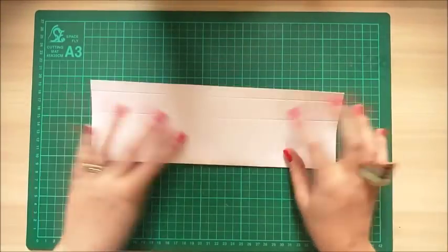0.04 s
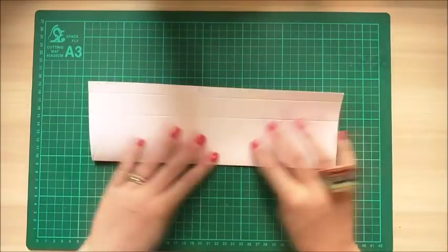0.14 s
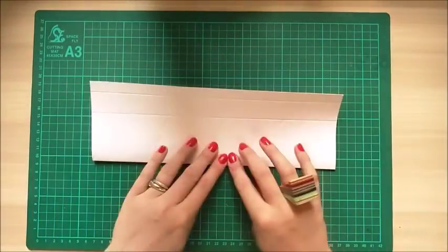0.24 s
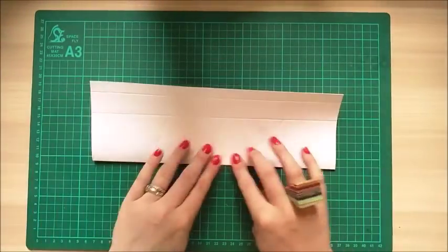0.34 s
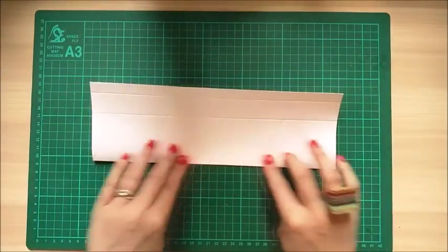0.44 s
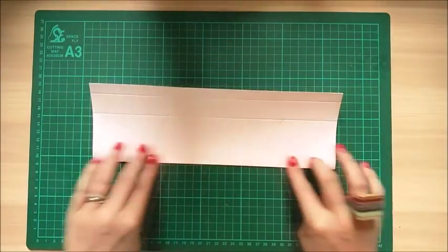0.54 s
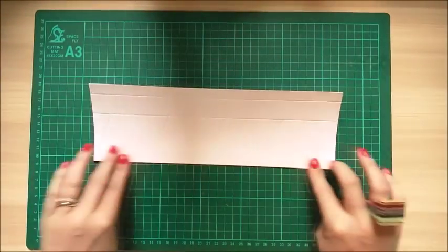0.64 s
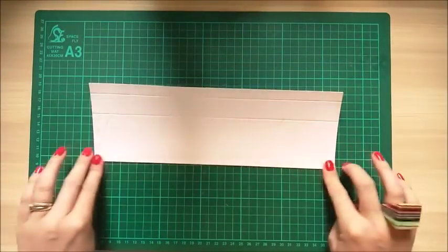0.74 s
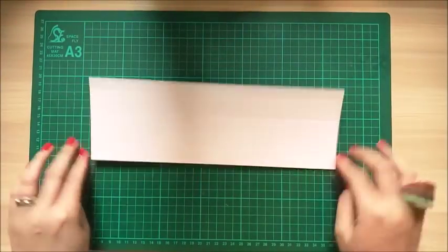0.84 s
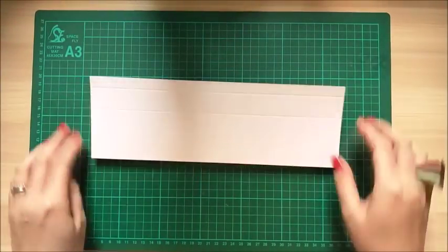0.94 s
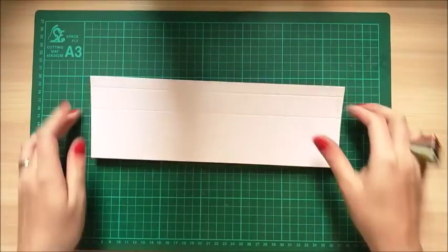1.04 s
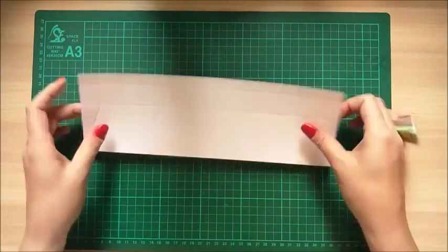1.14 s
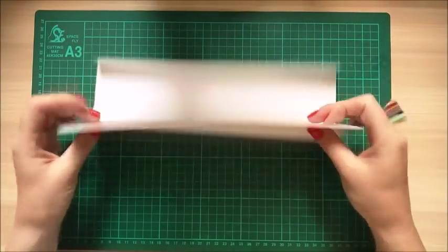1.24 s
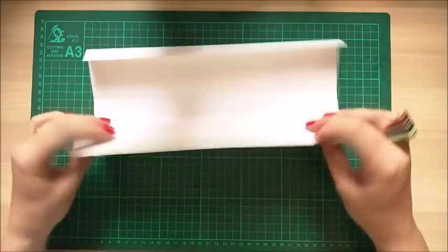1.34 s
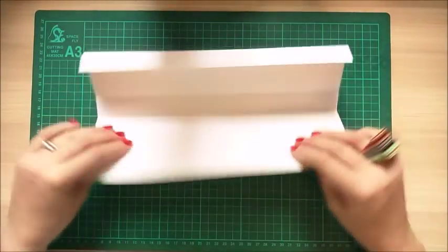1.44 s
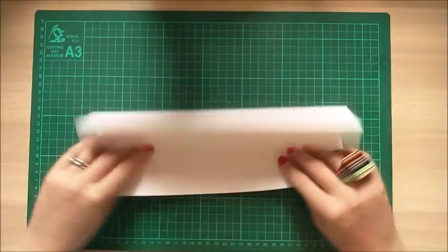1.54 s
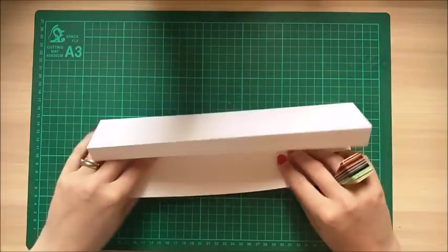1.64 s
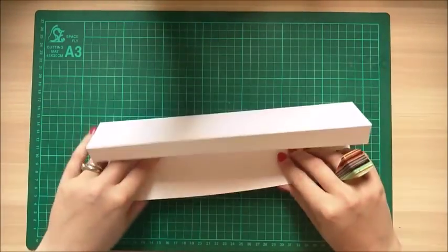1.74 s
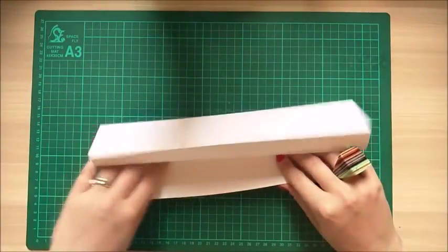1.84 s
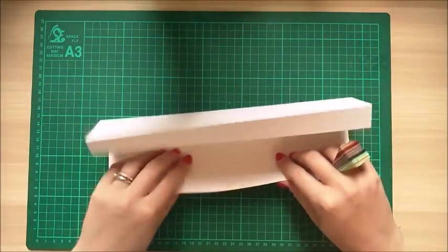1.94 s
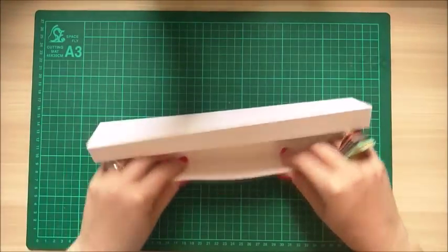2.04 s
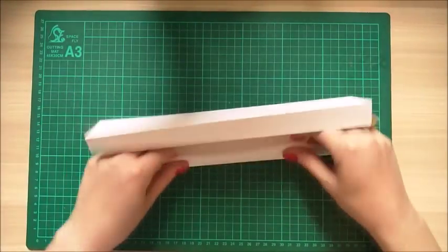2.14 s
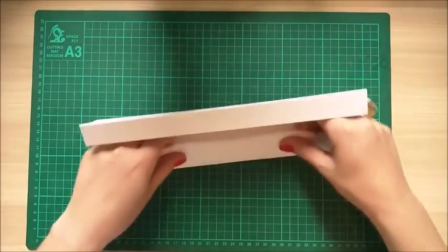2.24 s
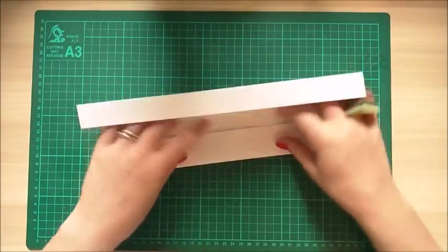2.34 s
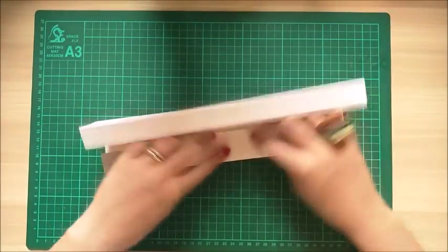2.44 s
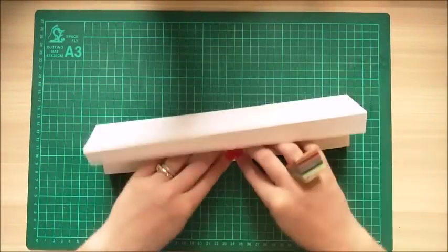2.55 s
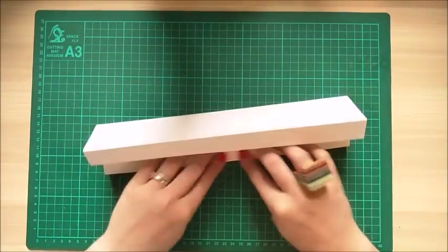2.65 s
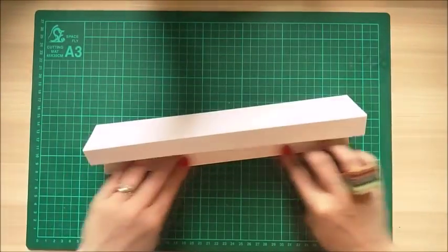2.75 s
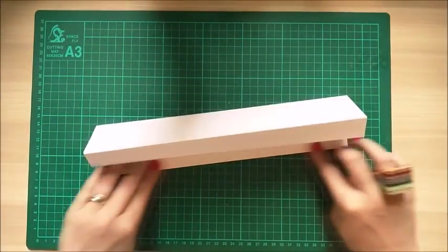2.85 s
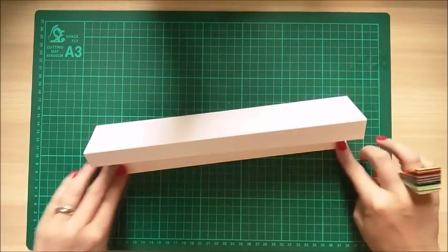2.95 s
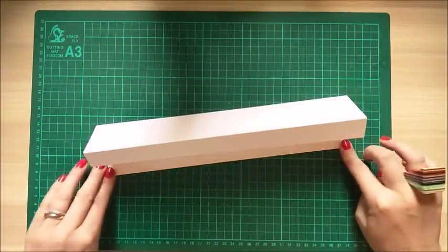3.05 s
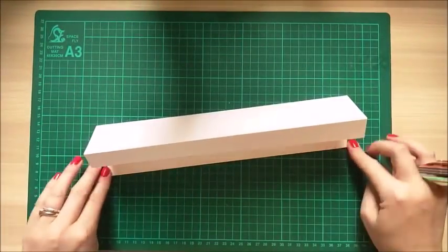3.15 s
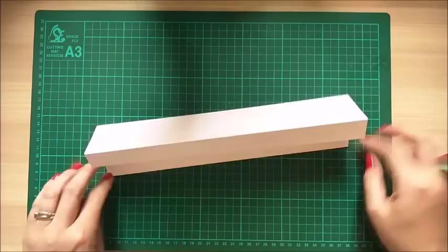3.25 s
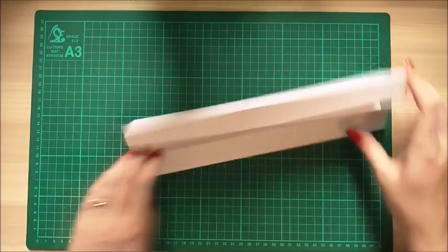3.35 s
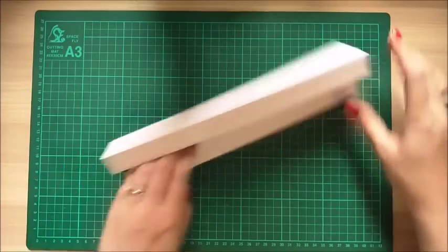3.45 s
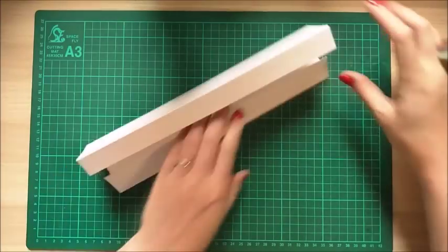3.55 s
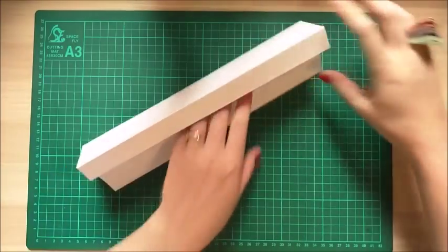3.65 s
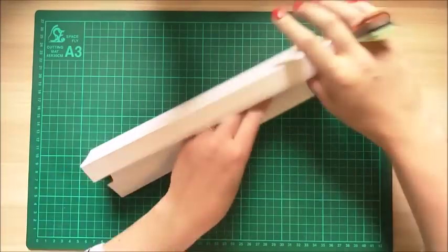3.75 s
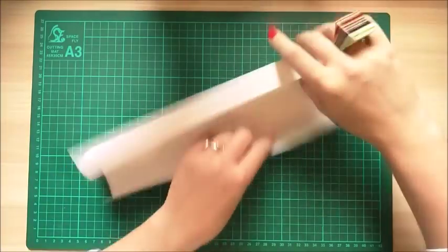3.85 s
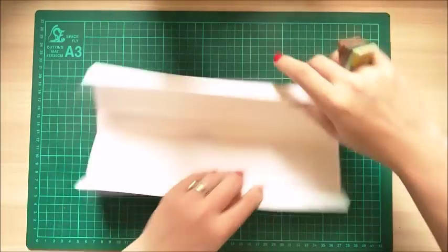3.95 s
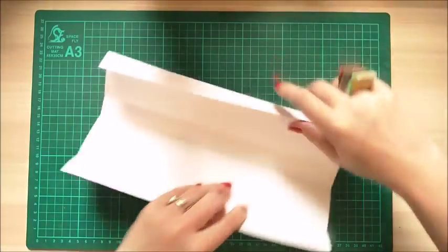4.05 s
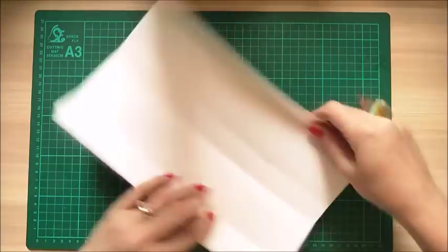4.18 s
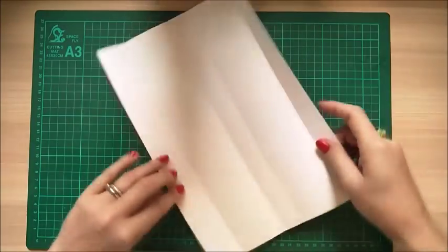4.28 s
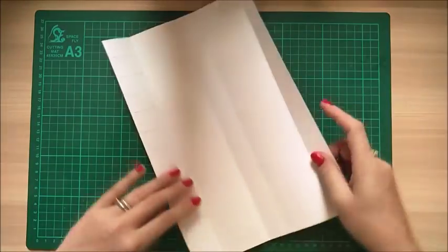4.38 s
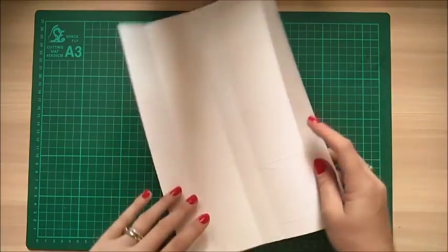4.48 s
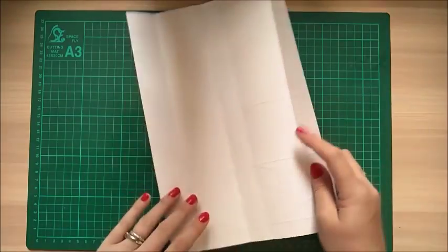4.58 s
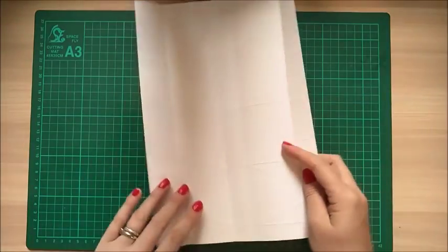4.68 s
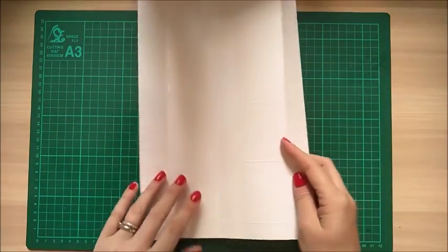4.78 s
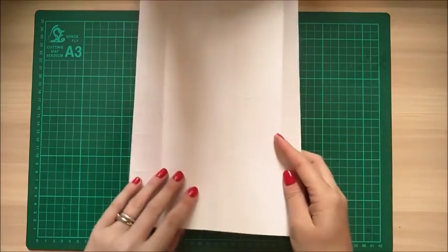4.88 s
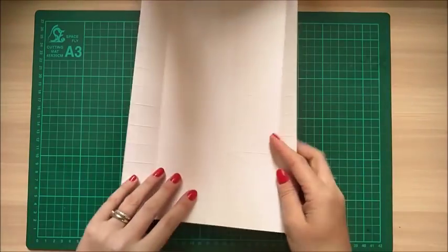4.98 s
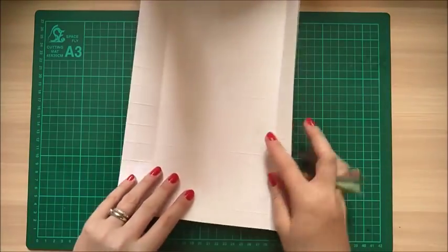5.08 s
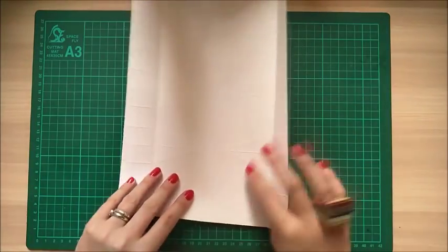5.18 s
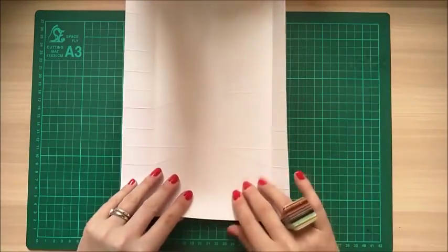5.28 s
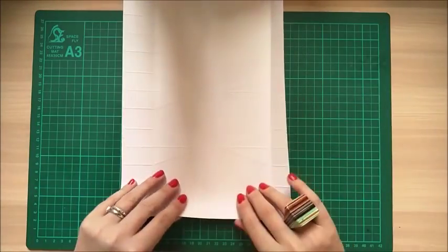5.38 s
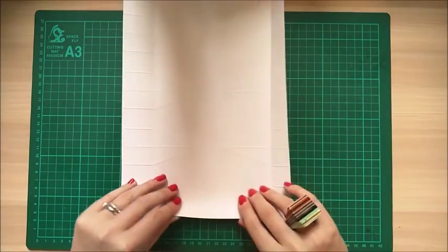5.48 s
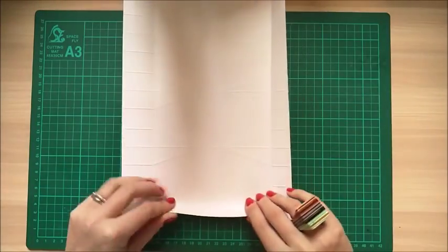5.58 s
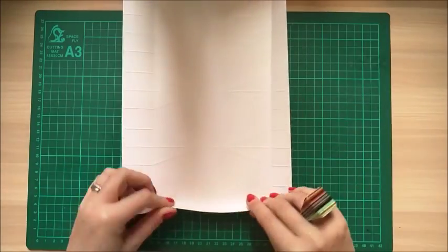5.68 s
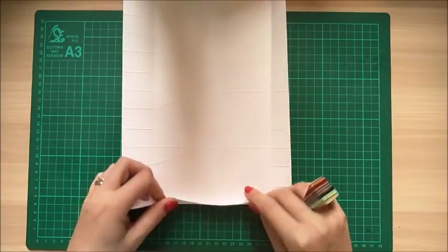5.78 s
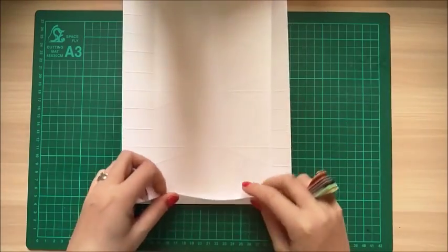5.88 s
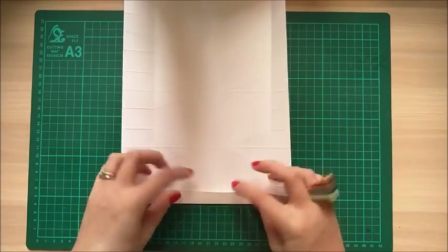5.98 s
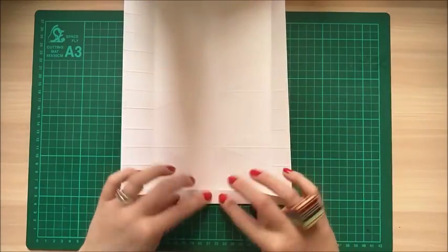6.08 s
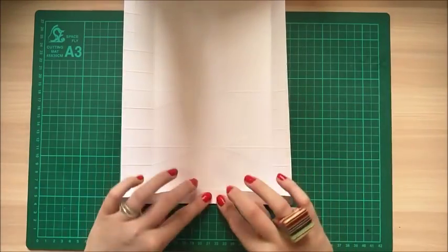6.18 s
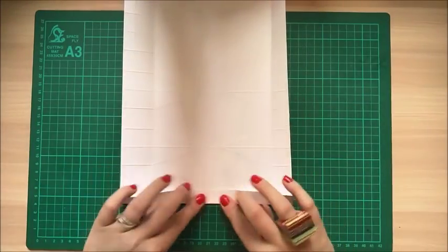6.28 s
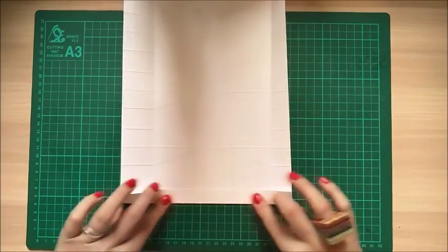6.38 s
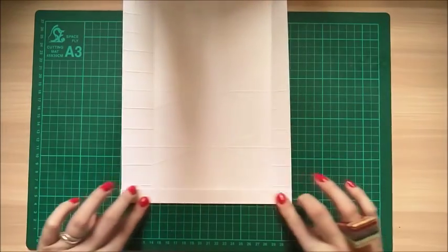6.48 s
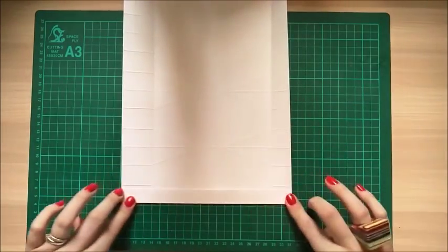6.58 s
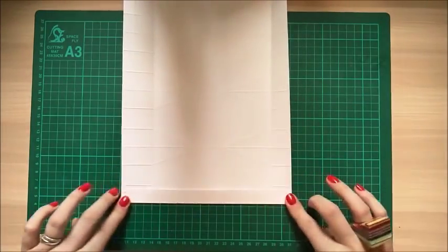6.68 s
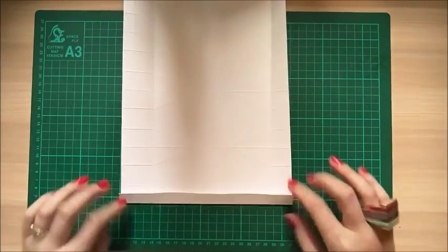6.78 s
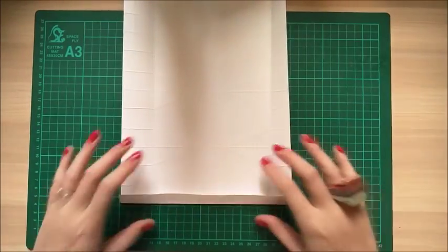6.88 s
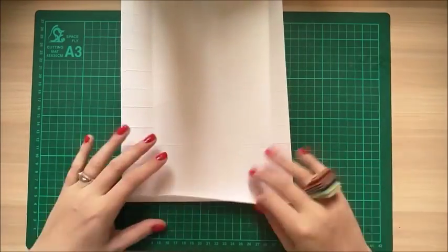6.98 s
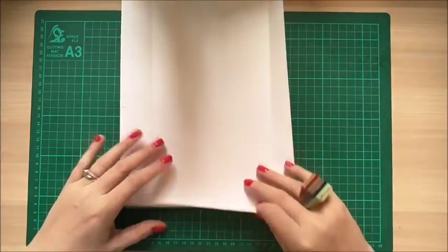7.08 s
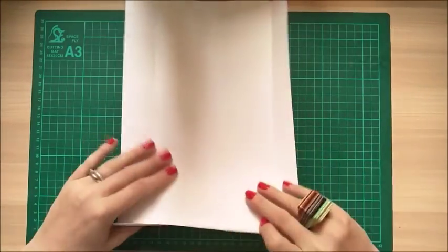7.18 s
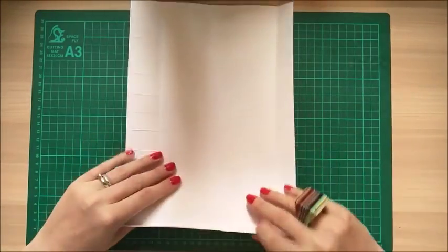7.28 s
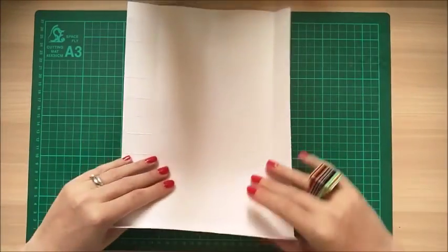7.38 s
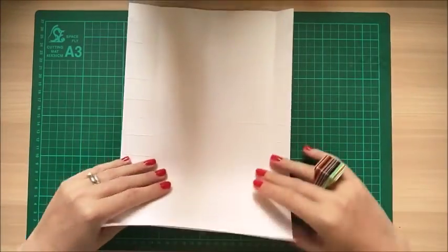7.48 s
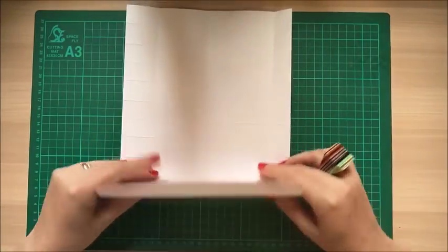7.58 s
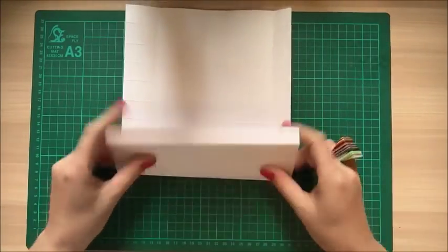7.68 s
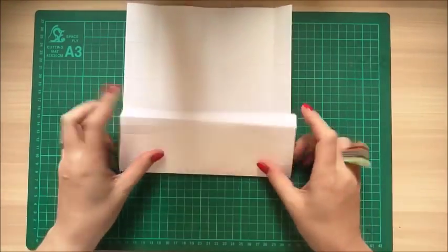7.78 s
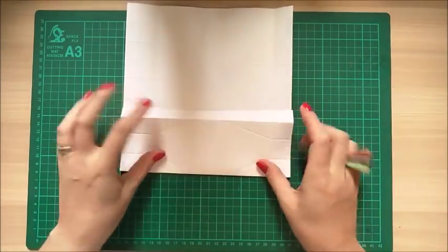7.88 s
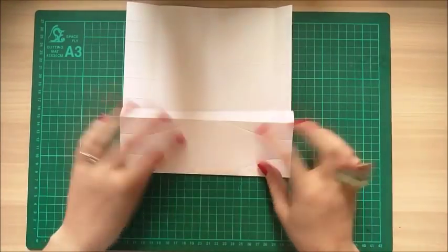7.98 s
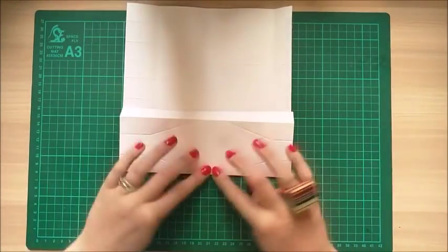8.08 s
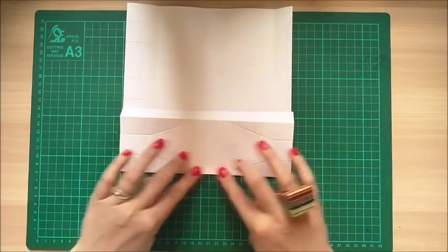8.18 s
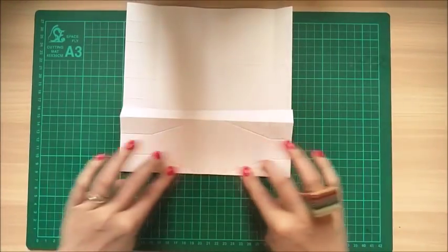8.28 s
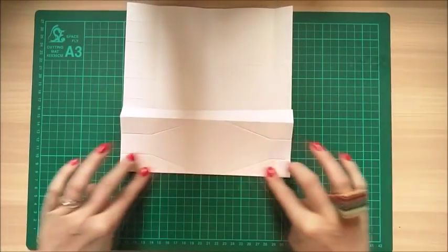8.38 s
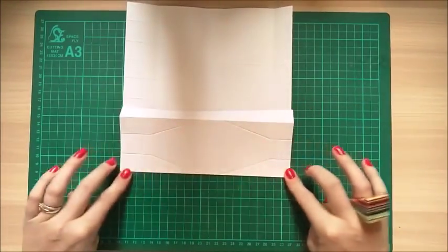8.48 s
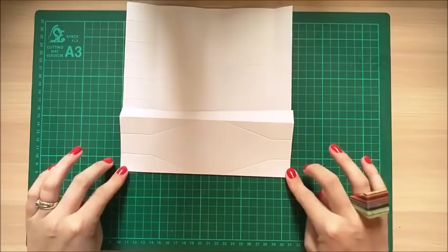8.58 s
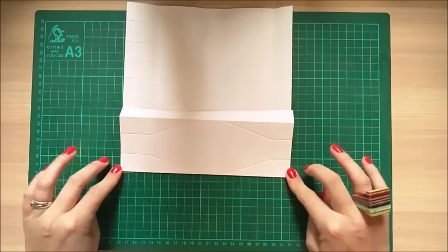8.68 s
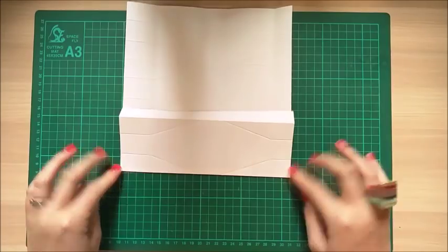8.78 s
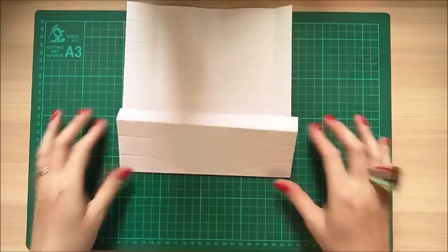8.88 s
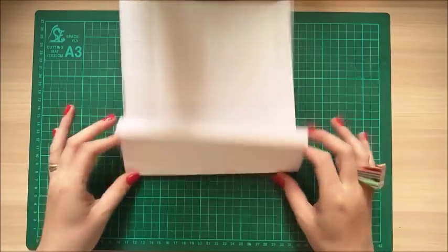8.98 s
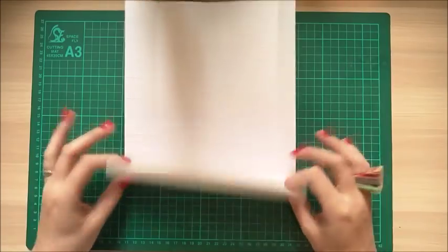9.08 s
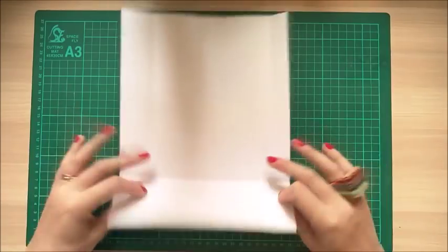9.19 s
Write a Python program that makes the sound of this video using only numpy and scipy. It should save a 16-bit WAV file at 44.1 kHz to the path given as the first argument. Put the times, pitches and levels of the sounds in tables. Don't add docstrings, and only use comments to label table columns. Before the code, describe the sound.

In a small quiet room, close to a stereo recorder, hands work stiff card on a mat. Scrape and fibre crackles come first, then a smooth fingertip press along a crease. A sharp snap and boxy knocks follow as the long folds close. The sheet is opened and turned with papery pops, then its end is creased with softer rubs, ticks and crackles, over faint hiss.

```python
import sys
import numpy as np
from scipy import signal
from scipy.fft import rfft, irfft, next_fast_len
from scipy.io import wavfile
from scipy.ndimage import uniform_filter1d, minimum_filter1d

SR = 44100
rng = np.random.default_rng(int(sys.argv[2]) if len(sys.argv) > 2 else 0)


def wav_record(signal):
    frames = np.transpose(np.atleast_2d(signal))
    bounded = np.clip(frames, -1, 1)
    quanta = np.round(bounded * 32767).astype(np.int16)
    wavfile.write(sys.argv[1], SR, quanta)


def natural_amplitude(level_db):
    exponent = np.asarray(level_db, float) / 20
    return 10 ** exponent


N = 407043
SIZE = next_fast_len(N, True)
HZ = np.fft.rfftfreq(SIZE, 1 / SR)


def evened(x):
    return x / np.sqrt(np.mean(x ** 2) + 1e-20)


def read(points, hz):
    f, value = np.transpose(points)
    return np.interp(np.log(hz + 1), np.log(f + 1), value)


def colour(x, gain):
    return irfft(rfft(x, SIZE) * gain, SIZE)[..., :N]


def modes(table, hz):
    power = sum(natural_amplitude(db) ** 2 / (1 + (2 * (hz - f) / width) ** 2) ** 2 for f, width, db in table)
    return np.sqrt(power)


def causal(gain):
    log = np.log(np.maximum(np.r_[gain, gain[-2:0:-1]], 1e-5))
    return np.fft.ifft(np.exp(signal.hilbert(log).conj())).real[:len(gain)]


# frequency in Hz, level in dB per Hz.
FLOOR_SPECTRUM = [(18, -70), (30, -38), (75, -12), (245, 0), (1350, -11.5), (1760, -8), (3580, -12.5),
                  (7270, -17), (12300, -4), (16000, -19)]


def floor():
    hiss = colour(rng.standard_normal((2, N)), natural_amplitude(read(FLOOR_SPECTRUM, HZ)))
    return natural_amplitude(-65.5) * evened(hiss)


# frequency in Hz, decay time (t60) in seconds.
ROOM_DECAY = [(200, 0.25), (1000, 0.29), (4000, 0.29), (15000, 0.033)]


def room(x):
    taps = np.zeros((2, SR // 2))
    jitter = rng.integers(0, 20, (2, (SR // 2 - 201) // 20))
    at = np.arange(200, SR // 2 - 20, 20) + jitter
    np.put_along_axis(taps, at, rng.choice([-1., 1.], at.shape), 1)
    hz, t, z = signal.stft(taps, SR, nperseg=256)
    t60 = np.maximum(read(ROOM_DECAY, hz), .05)[:, None]
    tail = signal.istft(z * natural_amplitude(-60 * t / t60), SR, nperseg=256)[1]
    return signal.fftconvolve(x, tail / np.linalg.norm(tail[0]), axes=1)[:, :N]


# frequency in Hz, left over right in dB.
PORT_TILT = [(60, 0.5), (110, 2), (200, 1.5), (380, -0.5), (700, 2), (1290, 2.5), (2380, 1), (4400, 4.5),
             (8120, 16), (15000, 34)]
# frequency in Hz, likeness from 0 to 1.
PORT_LIKENESS = [(60, 0.3), (130, 0.9), (250, 0.76), (500, 0.94), (1000, 0.6), (2000, 0.29), (5000, 0.02),
                 (15000, 0)]


def to_ports(a, b):
    lead_s = .0001
    same = np.clip(read(PORT_LIKENESS, HZ), 0, 1)
    right = natural_amplitude(-read(PORT_TILT, HZ))
    both = 2 / np.sqrt(1 + right ** 2 + 2 * same * right)
    late = colour(a, both * right * same * np.exp(-2j * np.pi * HZ * lead_s))
    own = colour(b, both * right * np.sqrt(1 - same ** 2))
    return np.array([colour(a, both), late + own])


# start in seconds, peak level in dB, pitch in Hz.
LANDINGS = [(0.017, -40, 260), (0.155, -33.5, 294), (0.245, -29, 244), (0.292, -41, 354),
            (1.11, -41.5, 242), (1.288, -45.5, 258), (3.491, -38, 308), (4.393, -42, 280),
            (5.005, -50, 257), (5.166, -51, 260), (7.182, -55, 276), (7.251, -58, 276), (7.851, -44, 242),
            (7.907, -41, 300), (9.061, -44.5, 216), (9.086, -44, 250), (9.137, -33, 320), (9.152, -39, 256)]


def thuds():
    rise_s = .003
    t, out = np.arange(2000) / SR, np.zeros((2, N + 2000))
    swell = t / rise_s * np.exp(1 - t / rise_s)
    for s, db, hz in LANDINGS:
        out[0, round(s * SR):][:len(t)] += natural_amplitude(db) * swell * np.sin(2 * np.pi * hz * t)
    return out[:, :N]


# start in seconds, peak level in dB, ring pitch in Hz, treble
# against the ring in dB. The folded hollow knocks.
HOLLOW_KNOCKS = [(0.152, -19, 780, -16.5), (1.675, -20, 720, -4), (1.909, -36, 666, -5),
                 (1.989, -37, 446, -5), (2.124, -17.5, 695, -13), (2.399, -31.5, 417, -10),
                 (2.55, -26, 430, -11), (3.234, -28.5, 416, -37), (3.378, -43, 585, -21),
                 (3.589, -20.5, 636, -8.5), (3.643, -23.5, 456, -46), (3.8, -49, 369, -14),
                 (3.926, -28.5, 690, -23.5), (4.011, -27, 618, -9.5), (4.324, -38, 884, -18),
                 (4.859, -37.5, 443, -7), (5.003, -40.5, 860, -5), (5.058, -40.5, 440, -23),
                 (5.163, -45, 440, -5), (6.389, -43.5, 535, -5), (6.834, -46, 423, -5),
                 (7.459, -38.5, 484, -0.5), (8.741, -53, 440, 0)]
SHEET_POPS = [(0.243, -21.5, 1150, -24), (0.26, -16, 1900, -11.5), (0.955, -43, 1610, -5),
              (0.998, -33, 2070, -14.5), (1.08, -32, 1190, -18), (1.4993, -17, 1280, -24),
              (4.04, -21, 1640, -8), (4.127, -32.5, 1180, -3), (4.231, -28, 1120, -27),
              (4.35, -24.5, 1190, -12), (4.39, -25.5, 1330, -16), (4.758, -35.5, 1190, -12.5),
              (4.816, -30.5, 1090, -15), (7.179, -37, 1300, -9), (7.231, -34, 1650, -16),
              (7.361, -24, 1500, -13), (7.777, -31, 1770, -7), (7.93, -23, 1560, -5),
              (7.981, -21.5, 1830, -45), (8.094, -34.5, 1800, -2), (8.156, -29, 1500, -24),
              (8.375, -33.5, 1900, -5), (8.645, -43, 1910, -10), (8.886, -47, 1910, -19),
              (9.061, -41, 1900, -12)]
EDGE_TICKS = [(0.079, -25, 2090, -5), (1.175, -49, 2100, -5), (1.818, -32.5, 2730, -5.5),
              (3.226, -49, 2830, -2), (5.201, -31, 3170, -5), (5.33, -33, 2370, -17),
              (5.384, -35, 2980, -11), (5.425, -31.5, 2700, -22), (6.118, -37, 2700, -9),
              (6.185, -40.5, 2300, -5), (7.052, -31, 2980, -5)]
FIBRE_CRACKLES = [(0.016, -28, 1340, -31), (0.106, -23.5, 1400, -20), (0.16, -19, 1420, -16),
                  (0.236, -25, 1500, -9), (0.268, -21.5, 1460, -23), (0.302, -26.5, 1510, -11),
                  (0.313, -27, 1700, -15), (0.357, -29, 1610, -10.5), (0.979, -36, 1310, -7),
                  (0.995, -43, 600, -25), (1.196, -35, 1030, -12), (1.222, -31, 1190, -19),
                  (1.284, -38, 1200, -18), (1.499, -12.5, 645, -11), (1.512, -27.5, 422, -32),
                  (3.597, -15.5, 640, -25), (3.606, -23, 620, -35), (3.65, -25, 490, -30),
                  (4.296, -35, 1030, -19), (4.518, -33.5, 1670, -12), (5.203, -47, 704, -28),
                  (8.242, -39, 1860, -6), (8.344, -36.5, 1960, -3), (1.506, -34, 3460, -5),
                  (1.581, -28.5, 990, -16), (1.69, -21.5, 715, -15), (1.703, -29, 715, -28),
                  (2.138, -34, 617, -34), (2.16, -33, 614, -27), (2.178, -32, 3900, -5),
                  (2.272, -36, 3220, -14.5), (3.338, -39.5, 594, -10), (3.444, -32.5, 617, -28),
                  (3.481, -34.5, 700, -25), (3.514, -39, 700, -25), (3.625, -22, 565, -31),
                  (3.884, -42, 394, -20), (7.202, -42, 1310, -15), (7.217, -38, 1410, -15),
                  (7.249, -34, 1100, -13), (7.814, -38, 1740, -13), (7.906, -31, 930, -19),
                  (9.05, -42, 3360, -5), (9.186, -38, 610, -13),
                  (2.295, -28.5, 616, -33), (2.454, -32.5, 1210, -22), (2.465, -36, 457, -25),
                (4.047, -21.5, 1790, -11), (4.054, -23.5, 1050, -11), (4.063, -32, 1750, -6),
                (4.398, -21.5, 1000, -12), (4.766, -46, 1000, -15), (4.857, -33.5, 483, -31),
                (5.3, -35, 2560, -13), (7.7, -42, 750, -29), (7.73, -42, 770, -27), (9.135, -24, 1860, -12),
                (9.14, -20.5, 1810, -12), (9.143, -27, 1000, -12), (9.151, -28, 806, -18),
                (9.162, -31.5, 1110, -17)]
CLEAN_CLICKS = [(0.138, -30, 1920, -20), (0.2605, -19, 3800, -20), (0.265, -33, 3400, -20),
                (0.31, -33, 4070, -18), (1.4984, -22, 5600, -28), (1.4996, -15, 3730, -13),
                (1.6761, -16, 6600, -9), (1.678, -29, 4340, -31), (2.556, -25, 2600, -20),
                (3.599, -36, 2100, -18), (3.807, -32, 3990, -12), (3.86, -35, 1700, -22),
                (4, -35, 3000, -20), (4.047, -27, 3400, -16), (4.233, -47, 3800, -20),
                (4.395, -24, 4100, -17), (5.4267, -36, 2700, -16), (7.064, -31, 2620, -20),
                (1.5, -18, 960, -36), (0.152, -24, 1450, -23), (3.043, -45, 9000, -18),
                (6.119, -40, 4000, -16), (6.833, -47, 3000, -12), (3.379, -42, 900, -20),
                (8.899, -40, 1860, -14)]
# frequency in Hz, level in dB per Hz.
CRACK_SPECTRUM = [(300, -28), (600, -5.5), (1600, -11), (3600, -4), (6200, -4), (8500, -4), (12200, 2),
                  (16000, -3)]
# frequency in Hz, width in Hz, level in dB.
HOLLOW_MODES = [(270, 85, 7), (392.5, 90, 2.5), (479, 46, 0.5), (610, 70, 0), (750, 96, 2.5)]


def snaps():
    kinds = [(HOLLOW_KNOCKS, .086), (SHEET_POPS, .054), (EDGE_TICKS, .05),
             (FIBRE_CRACKLES, .041), (CLEAN_CLICKS, .011)]
    t, out = np.arange(3600) / SR, np.zeros((2, N + 8000))
    for events, t60 in kinds:
        for s, db, ring_hz, treble_db in events:
            sound = snap(t, t60, ring_hz, min(treble_db, -5))
            at = round(s * SR)
            out[:, at:at + sound.shape[1]] += natural_amplitude(db - 7.5) * sound
    return out[:, :N]


def snap(t, t60, ring_hz, treble_db):
    hz = np.fft.rfftfreq(2048, 1 / SR)
    noise = rng.standard_normal((2, len(t)))
    crack = noise * (1 - np.exp(-t / 0.00095)) * natural_amplitude(-60 * t / .006)
    jolts_db = 4.5 * evened(uniform_filter1d(noise[0, ::-1], size=int(.0015 * SR)))
    rattle = noise[::-1] * (1 - np.exp(-t / 0.0017)) * natural_amplitude(-60 * t / t60 + jolts_db)
    octave_up = np.clip(np.log2(hz / 2500 + 1e-9), 0, 1)
    bright = natural_amplitude(read(CRACK_SPECTRUM, hz) + (treble_db + 2.5) * octave_up)
    wide = 0.33 + 0.5 * (t60 < .03)
    ring = modes([(ring_hz, wide * ring_hz, 0), (1.674 * ring_hz, 0.37 * ring_hz, -8)], hz)
    ring = ring + 0.014 * modes(HOLLOW_MODES, hz)
    strike = rattle + 2.6 * crack + 7 * signal.unit_impulse(len(t), 30)
    body = signal.fftconvolve(strike, causal(ring)[None], axes=1)
    edge = signal.fftconvolve(crack + .11 * rattle, causal(bright)[None], axes=1)
    return body / abs(body).max() + natural_amplitude(1.08 * (treble_db + 17.5)) * edge / abs(edge).max()


def slips(per_s, spread_db, clump_s, clump_db):
    length = int(clump_s * SR)
    clumps = evened(uniform_filter1d(uniform_filter1d(rng.standard_normal(N), length), length))
    sizes = natural_amplitude(spread_db * np.minimum(rng.exponential(1, N), 3.5))
    clicks = sizes * (rng.random(N) < per_s / SR)
    return natural_amplitude(clump_db * np.minimum(clumps, 1)) * (1 + clicks) * rng.standard_normal((2, N))


def gripped(drive, table, centre_hz, fall_db):
    lines, out = rfft(drive, SIZE), 0
    for mode in table:
        ring = irfft(lines * modes([mode], HZ), SIZE)[:, :N]
        out = out + natural_amplitude(-fall_db * np.log2(mode[0] / centre_hz) ** 2) * ring
    return out / np.sqrt(uniform_filter1d((out ** 2).mean(0), SR // 2))


def grip_hz(snapped, rest_hz, pull, t):
    s, _, hz, _ = np.transpose(snapped)
    return rest_hz * (np.interp(t, s, hz) / rest_hz) ** pull


def strokes(rows, t, blunt):
    s, rise, fall, db = np.transpose(rows)[:4, :, None]
    far = np.where(t < s, (s - t) / np.maximum(rise, .005), (t - s) / np.maximum(fall, .005))
    return natural_amplitude(2 * (db - 20 * np.minimum(far, 20) ** blunt))


# frequency in Hz, level in dB per Hz.
RUB_SPECTRUM = [(530, -73), (900, -15), (979, -29), (1340, -30), (2020, -17.5), (3510, -30.5), (4100, -20),
                (7060, -8.5), (12100, 5.5), (15100, 0.5), (16000, -36)]


def fingertip_rub(strength, pressed):
    clump_db = 1.68 * (1.5 - 1.3 * pressed)
    hiss = slips(per_s=300, spread_db=2.0, clump_s=0.025, clump_db=clump_db)
    return strength * evened(colour(hiss, natural_amplitude(read(RUB_SPECTRUM, HZ))))


# frequency in Hz, width in Hz, level in dB.
SCRAPE_MODES = [(2700, 2760, 3.5), (4070, 990, -7.5), (6460, 4300, 1.5)]
# time in seconds, scrape level in dB.
DRAG_LEVEL = [(0, -1.5), (.9, 0.5), (1.4, -1), (1.7, 3), (2.15, -3), (2.6, 2.5), (3.3, -2), (3.47, -2),
              (3.8, 0), (4.2, -4), (4.8, 0.5), (5.6, 1), (6.2, -1), (6.7, 1.5), (7.08, 0), (7.5, 3),
              (8.2, -1.5), (9.1, -2.5)]


def edge_scrape(strength, hz, t):
    drag = natural_amplitude(np.interp(t, *np.transpose(DRAG_LEVEL)))
    grit = slips(per_s=400, spread_db=4.0, clump_s=0.025, clump_db=2.5)
    return drag * strength * gripped(grit, SCRAPE_MODES, hz, fall_db=18)


# frequency in Hz, width in Hz, level in dB.
SHEET_MODES = [(1190, 1730, 3), (1560, 620, -3), (1860, 230, 5.5), (1960, 2700, 3)]


def bending_sheet(strength, hz, t):
    flap = (t > 7.74) & (t < 9)
    grains = slips(per_s=110, spread_db=6.5, clump_s=0.022, clump_db=5.0)
    pocket = evened(colour(grains, modes([(1850, 200, 0)], HZ)))
    grains = slips(per_s=420, spread_db=5.5, clump_s=0.011, clump_db=4.5)
    sheet = gripped(grains, SHEET_MODES, hz, fall_db=36)
    return strength * (natural_amplitude(-7) * flap * pocket + natural_amplitude(-2 - 2 * flap) * sheet)


def folded_hollow(strength, hz):
    creaks = slips(per_s=60, spread_db=1.5, clump_s=0.01, clump_db=3.0)
    return natural_amplitude(-2.0) * strength * gripped(creaks, HOLLOW_MODES, hz, fall_db=14)


# peak time in seconds, rise in seconds, fall in seconds, effort in dB.
CREASE_PRESSES = [
    (0.654, 0.28, 0.23, -41),
    (2.923, 0.24, 0.23, -40),
    (6.476, 0.17, 0.29, -42.5),
    (8.406, 0.12, 0.21, -43),
]
# peak time
# in seconds, rise in seconds, fall in seconds, effort in dB.
SLIDES = [(0.013, 0.14, 0.054, -32), (0.079, 0.059, 0.12, -40), (0.266, 0.26, 0.16, -36.5),
          (0.981, 0.05, 0.068, -39), (1.118, 0.046, 0.047, -56), (1.195, 0.034, 0.03, -41),
          (1.24, 0.11, 0.14, -45), (1.367, 0.092, 0.11, -33.5), (1.5, 0.025, 0.19, -38.5),
          (1.674, 0.21, 0.43, -41.5), (1.826, 0.13, 0.022, -46), (1.997, 0.25, 0.15, -40),
          (2.135, 0.039, 0.071, -61), (2.178, 0.11, 0.041, -31.5), (2.225, 0.045, 0.066, -42.5),
          (2.275, 0.013, 0.026, -35.5), (2.31, 0.09, 0.21, -43), (2.472, 0.13, 0.013, -35),
          (2.599, 0.23, 0.079, -39), (3.222, 0.045, 0.27, -55.5), (3.343, 0.11, 0.017, -53.5),
          (3.41, 0.026, 0.11, -36.5), (3.455, 0.055, 0.088, -33), (3.5, 0.064, 0.094, -39.5),
          (3.588, 0.043, 0.94, -41.5), (3.825, 0.029, 0.088, -31.5), (3.913, 0.066, 0.083, -37.5),
          (4.051, 0.12, 0.3, -37.5),
          (4.233, 0.009, 0.024, -37.5), (4.314, 0.026, 0.17, -38.5), (4.532, 0.39, 0.077, -42.5),
               (4.663, 0.23, 0.082, -45), (4.934, 0.51, 0.47, -50.5), (5.106, 0.062, 0.057, -44.5),
               (5.203, 0.069, 0.054, -42.5), (5.27, 0.05, 0.11, -45.5), (5.609, 0.65, 0.27, -44),
               (5.757, 0.11, 0.07, -46.5), (5.878, 0.19, 0.08, -50), (5.933, 0.037, 0.086, -45.5),
               (6.06, 0.11, 0.12, -52), (6.113, 0.025, 0.025, -45), (6.183, 0.024, 0.14, -40),
               (6.87, 0.051, 0.061, -49.5), (7.088, 0.043, 0.096, -34.5), (7.273, 0.16, 0.06, -45.5),
               (7.373, 0.24, 0.06, -43.5), (7.526, 0.2, 0.56, -45.5), (7.79, 0.028, 0.75, -36),
               (7.922, 0.42, 0.17, -36), (8.168, 0.081, 0.063, -37), (8.252, 0.049, 0.21, -52),
               (8.751, 0.024, 0.079, -55), (8.893, 0.032, 0.03, -41.5), (9.072, 0.033, 0.024, -30.5),
               (9.123, 0.066, 0.15, -39.5)]
# peak time in seconds, rise in seconds, fall in seconds, effort in
# dB, hollow against sheet in dB.
BENDS = [(0.168, 0.45, 0.2, -41.5, -1), (0.03, 0.047, 0.099, -36.5, -9),
         (0.255, 0.045, 0.073, -30.5, -7), (0.309, 0.035, 0.15, -41, -6.5),
         (0.598, 0.27, 0.039, -55.5, -7), (0.672, 0.093, 0.64, -55, -11),
         (0.98, 0.027, 0.066, -41, -8), (1.083, 0.023, 0.11, -47, 1), (1.212, 0.065, 0.27, -46, -5),
         (1.49, 0.0048, 0.28, -38, -1), (1.668, 0.013, 0.13, -32, 11), (1.919, 0.043, 0.054, -57, 0),
         (1.994, 0.051, 0.046, -42.5, 15), (2.125, 0.014, 0.16, -37.5, 8),
         (2.3, 0.016, 0.061, -38.5, 22), (2.472, 0.68, 0.19, -47, 5), (2.538, 0.01, 0.84, -54, 7),
         (3.23, 0.0086, 0.046, -44, 18), (3.384, 0.012, 0.042, -46, 12),
         (3.46, 0.057, 0.034, -44.5, 19), (3.505, 0.052, 0.076, -41.5, 12),
         (3.588, 0.021, 0.14, -29, 17), (3.68, 0.05, 0.11, -55, 10), (3.82, 0.035, 0.11, -48, 11),
         (3.938, 0.11, 0.15, -39, 9), (4.05, 0.022, 0.17, -38, -8),
         (4.23, 0.022, 0.31, -51.5, -32.5), (4.397, 0.065, 0.095, -37.5, -3),
         (4.519, 0.03, 0.058, -47.5, -23), (4.864, 0.67, 0.066, -53, -16),
              (5.012, 0.44, 0.62, -57, -7), (5.205, 0.023, 0.044, -43, -3), (5.307, 0.079, 1, -65, 8),
              (5.943, 0.29, 0.25, -62, -7), (6.122, 0.026, 0.097, -61, -4), (6.182, 0.033, 0.35, -65, 19),
              (6.392, 0.03, 0.38, -65, 17), (6.837, 0.061, 0.15, -58.5, 6),
              (7.053, 0.019, 0.071, -48.5, -4), (7.191, 0.12, 0.098, -47.5, -5),
              (7.26, 0.11, 0.25, -49, -2.5), (7.361, 0.018, 0.048, -37.5, -18),
              (7.559, 0.19, 0.19, -48.5, -7.5), (7.811, 0.072, 0.32, -40.5, -7.5),
              (7.933, 0.11, 0.15, -41, -9), (8.101, 0.062, 0.044, -43, -15),
              (8.156, 0.015, 0.08, -46, -6.5), (8.383, 0.06, 0.025, -40, -16),
              (8.59, 0.42, 0.094, -56, -23), (8.77, 0.04, 0.043, -59, -19), (8.894, 0.032, 0.026, -50, -19),
              (9.07, 0.024, 0.074, -42.5, -2), (9.145, 0.04, 0.041, -33, -6),
              (9.19, 0.055, 0.074, -38.5, 3.5)]


def handling():
    t, ms = np.arange(N) / SR, np.arange(0, N / SR, .001)
    still_s, full_s = 0.022, 0.0018
    clock = t.copy()
    for s, *_ in HOLLOW_KNOCKS + SHEET_POPS + EDGE_TICKS:
        at = round(s * SR)
        clock[max(at - int(still_s * SR), 0):at] = s - still_s
        clock[at:at + int(full_s * SR)] = s + full_s

    crease = strokes(CREASE_PRESSES, ms, blunt=3.6).sum(0)
    slide = strokes(SLIDES, ms, blunt=1.127).sum(0)
    hands = crease + slide
    bend_rows = BENDS
    bends = strokes(bend_rows, ms, blunt=0.9)
    open_share = 1 / (1 + natural_amplitude(2 * np.transpose(bend_rows)[4]))
    sheet, hollow, bending = open_share @ bends, (1 - open_share) @ bends, bends.sum(0)
    edge = natural_amplitude(2 * -18.5) * crease + natural_amplitude(2 * -8.5) * slide + natural_amplitude(2 * -5.5) * sheet

    def strength(power):
        return np.interp(clock, ms, np.sqrt(power))

    pressed = np.interp(t, ms, crease / (hands + 1e-12))
    skin_hz, card_hz, card_weight = 4970, 3830, natural_amplitude(2 * 16)
    skin_share = 1 / (1 + card_weight * bending / (hands + 1e-12))
    scrape_hz = np.interp(t, ms, card_hz + (skin_hz - card_hz) * skin_share)
    loose_hz, closed_hz = 322, 583
    rest_hz = np.interp(t, ms, loose_hz + (closed_hz - loose_hz) * hollow / (bending + 1e-30))
    sheet_hz = grip_hz(SHEET_POPS, rest_hz=1600, pull=.9, t=t)
    hollow_hz = grip_hz(HOLLOW_KNOCKS, rest_hz, pull=0.28, t=t)

    out = fingertip_rub(strength(hands), pressed)
    out += edge_scrape(strength(edge), scrape_hz, t)
    out += bending_sheet(strength(sheet), sheet_hz, t)
    out += folded_hollow(strength(hollow), hollow_hz)
    return natural_amplitude(-1.38) * out


def scene():
    card = to_ports(*(handling() + snaps() + thuds() + floor()))
    return card + natural_amplitude(-10.0) * room(card)


def flickering(x, patchy_db, hole_db, rare):
    hz, _, z = signal.stft(x, SR, nperseg=512, noverlap=256)
    patches = uniform_filter1d(rng.standard_normal(z.shape[1:]), size=2, axis=0)
    patches = evened(uniform_filter1d(patches, size=11, axis=1))
    exposed = np.interp(hz, [1800, 3000, 7500, 11000], [0, 1, 1, .15])[:, None]
    holes = np.clip(-patches - rare, 0, .3) / .3
    power = uniform_filter1d(np.diff(x[1]) ** 2, size=48) + 1e-14
    before = minimum_filter1d(uniform_filter1d(power, size=256), size=256, origin=127)
    jump = power / before
    calm = -minimum_filter1d(-jump, size=640)[::256] < 14
    calm = np.resize(calm, z.shape[2])
    flicker = natural_amplitude(calm * (patchy_db * patches + hole_db * exposed * holes))
    kept = (hz < 1.02 * 15920)[:, None]
    return signal.istft(z * kept * flicker, SR, nperseg=512, noverlap=256)[1][:, :N]


def low_pass(x):
    return signal.sosfilt(signal.butter(12, 15920, fs=SR, output="sos"), x)


def record(dry):
    cut = signal.sosfilt(signal.butter(4, 170, "high", fs=SR, output="sos"), dry)
    knocks = signal.sosfilt(signal.butter(2, 2500, fs=SR, output="sos"), cut)
    bumps = signal.sosfilt(signal.butter(2, [15, 90], "band", fs=SR, output="sos"), knocks ** 2)
    mix = flickering(cut + natural_amplitude(-30) * dry + .25 * bumps, patchy_db=2.4, hole_db=-32, rare=.78)
    return low_pass(mix)


dry = scene()
out = record(dry)
wav_record(out)
```